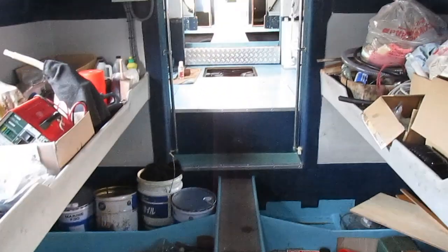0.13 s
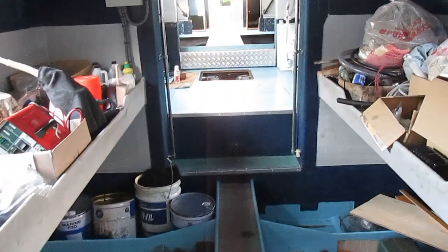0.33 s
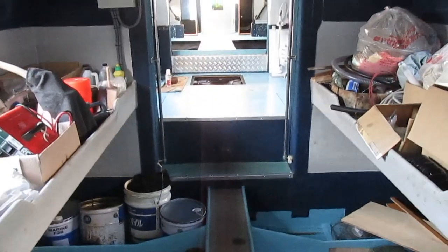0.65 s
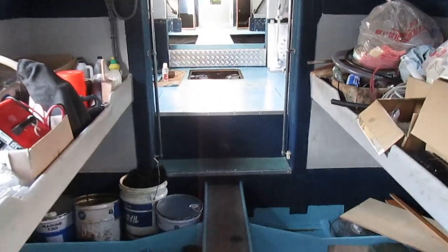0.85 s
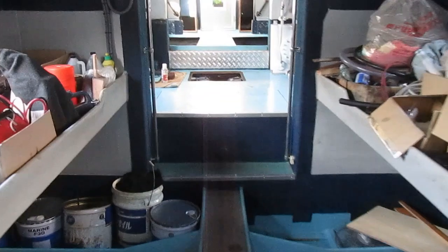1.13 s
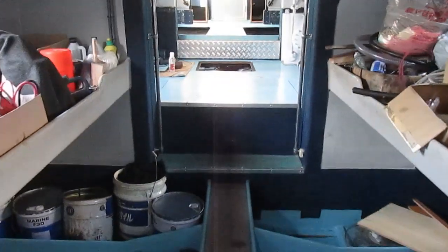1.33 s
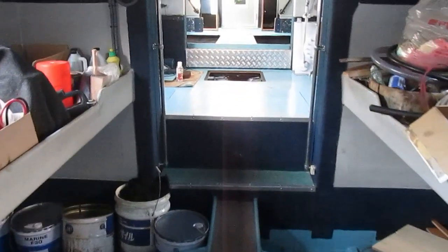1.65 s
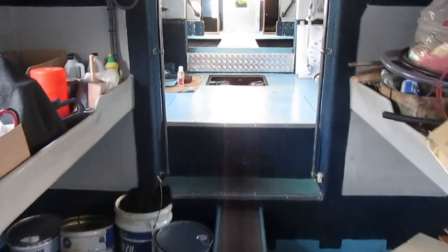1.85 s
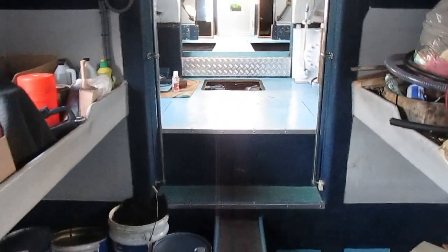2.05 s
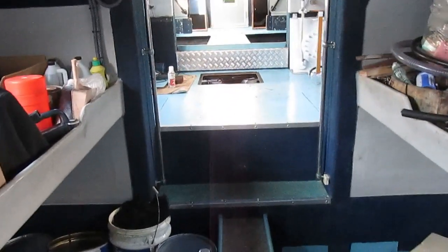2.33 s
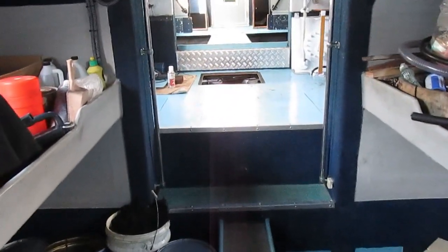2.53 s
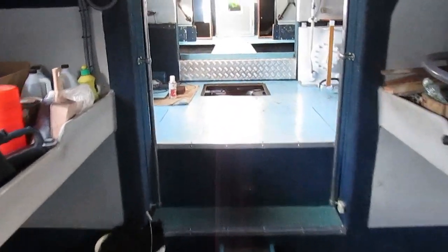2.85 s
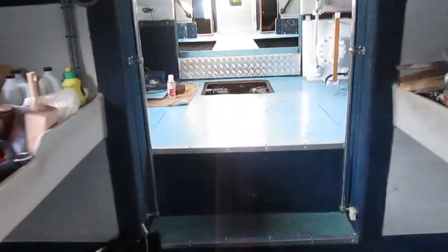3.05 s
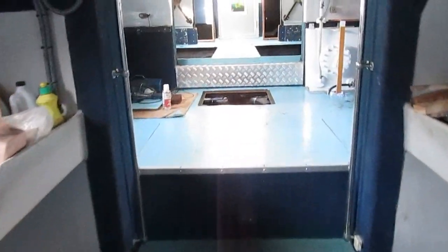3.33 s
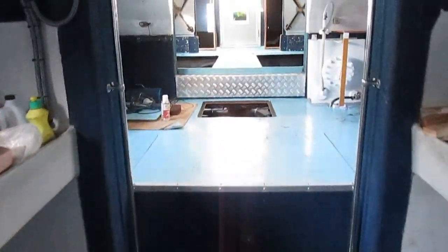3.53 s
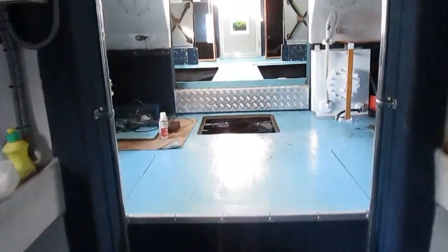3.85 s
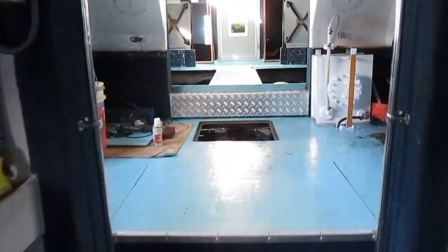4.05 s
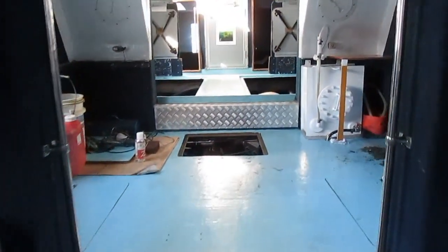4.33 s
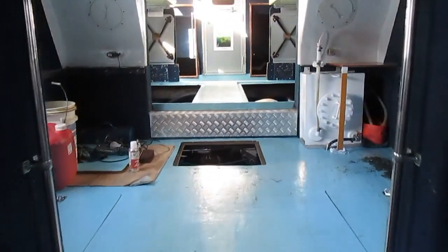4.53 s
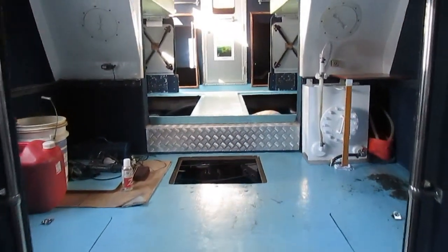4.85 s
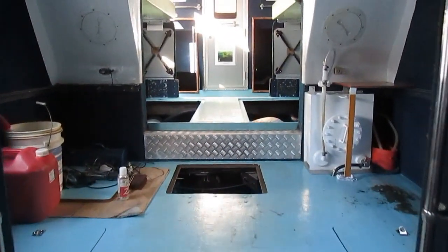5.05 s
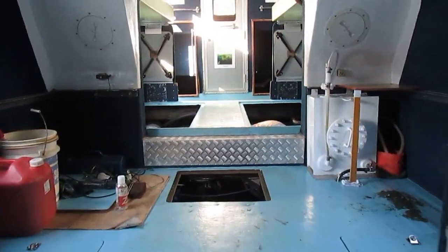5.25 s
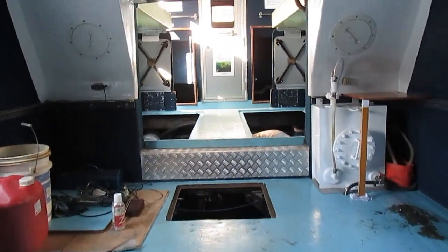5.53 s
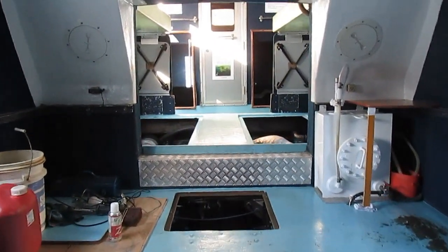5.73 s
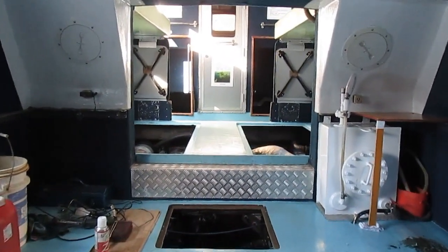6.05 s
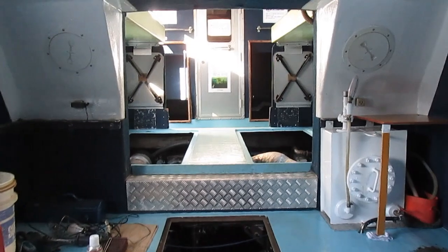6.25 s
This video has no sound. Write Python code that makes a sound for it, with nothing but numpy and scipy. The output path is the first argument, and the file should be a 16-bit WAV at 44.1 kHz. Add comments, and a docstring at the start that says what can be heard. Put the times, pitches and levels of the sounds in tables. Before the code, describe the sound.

Inside a steel boat cabin, a loud slap and heavy floor thump lead into scattered hollow knocks, jingling keys and a gritty dragging sole.

```python
"""One hears knocks on a floor, slaps, ticks, jingling keys and a dragging sole over a low hum and a hiss:
someone walks through the steel-hulled cabin of a boat, camera in hand. Feet and loose boards ring decaying
floor modes amid diffuse noise; slaps are diffuse bursts alone; the camera's shell and the keys ring modally.
The sole drags as coloured noise and squeals in narrow sliding bands; shuffling and hiss are coloured noise,
and the hull hums as a narrow band of noise."""
import sys
import numpy as np
from scipy import signal
from scipy.fft import rfft, irfft
from scipy.io import wavfile
from scipy.ndimage import uniform_filter1d

SR = 44100
rng = np.random.default_rng(int(sys.argv[2]) if len(sys.argv) > 2 else 0)


def transcribe(signal):
    """Save signal, clipped to [-1, 1], as a 16-bit WAV file at the path in sys.argv[1]."""
    frames = np.atleast_2d(signal).T
    limited = np.clip(frames, -1, 1)
    pcm = np.round(limited * 32767).astype(np.int16)
    wavfile.write(sys.argv[1], SR, pcm)


N = 282240  # samples of the whole scene
SPAN = 16384  # samples of one blow or slap


def amp(db):
    """Level law: decibels to an amplitude ratio."""
    return 10 ** (np.asarray(db) / 20)


def evened(x):
    """Power normalisation: scales to an rms of one."""
    return x / np.sqrt(np.mean(x ** 2) + 1e-20)


def read(points, hz):
    """Spectrum interpolation: reads a curve linearly over log frequency."""
    f, value = np.transpose(points)
    return np.interp(np.log(hz + 1), np.log(f + 1), value)


def curves(rows):
    """Envelope interpolation: each column of a table drawn out over the scene."""
    s, *columns = np.transpose(rows)
    t = np.arange(N) / SR
    return [np.interp(t, s, column) for column in columns]


def add(mix, s, sound):
    """Superposition: adds a sound in place from s seconds on, cut at the end of the mix."""
    part = mix[:, round(s * SR):][:, :sound.shape[1]]
    part += sound[:, :part.shape[1]]


def sides(mid, off):
    """Mid-side stereophony: left is the sum and right the difference."""
    return np.array([mid + off, mid - off])


def noise(colour, side):
    """Spectral shaping: stereo noise of a given colour, from unrelated mid and side parts."""
    hz = np.fft.rfftfreq(N, 1 / SR)
    spectrum = rfft(rng.standard_normal((2, N))) * amp(read(colour, hz))
    mid, off = irfft(spectrum * [np.ones_like(hz), amp(read(side, hz))], N)
    return sides(mid, off) / mid.std()


def resonate(x, hz, width_hz):
    """Heterodyne resonance: shifts hz down to zero, smooths twice, shifts back and evens the power."""
    turn = np.exp(2j * np.pi * np.cumsum(hz * np.ones(x.shape[-1])) / SR)
    r = np.exp(-np.pi * width_hz / SR)  # width_hz is the bandwidth of a single smoothing
    smooth = signal.lfilter([1], np.convolve([1, -r], [1, -r]), x / turn)
    return evened((turn * smooth).real)


def ring(modes, gain_db, stretch, size, detune):
    """Modal synthesis: dying sines, one for each mode, never struck at quite the same pitch."""
    hz, db, t60 = np.transpose(modes)[:, :, None]
    hz = hz * (1 + detune * rng.standard_normal(hz.shape))
    t = np.arange(size) / SR
    decay = amp(db + gain_db[:, None] - 60 * t / (t60 * stretch))
    return (decay * np.sin(2 * np.pi * hz * t)).sum(0)


def coloured(x, gain_db):
    """Minimum phase: a gain curve filters causally, so that nothing sounds ahead of the contact."""
    log_gain = np.maximum(gain_db - gain_db.max(), -90) * np.log(10) / 20
    # the Hilbert transform of the log gain, mirrored to negative frequencies, gives the phase
    mirrored = np.append(log_gain, log_gain[-2:0:-1])
    phase = -signal.hilbert(mirrored).imag[:len(log_gain)]
    return irfft(rfft(x) * np.exp(log_gain + 1j * phase))


def peaked(x):
    """Crest factor: three times the first channel's rms at its loudest moment is scaled to one."""
    power = uniform_filter1d(np.atleast_2d(x)[0] ** 2, 400)
    return x / (3 * np.abs(power).max() ** .5)


def rise_from_rest(rise):
    """Exponential build-up with a time constant of rise seconds, 0.3 ms at the least."""
    t = np.arange(SPAN) / SR
    return 1 - np.exp(-t / max(rise, .0003))


# Reverberation of the cabin. Each row: band centre in Hz, t60 in seconds before stretching.
CABIN = [(60, 1), (250, 0.69), (700, 0.25), (2000, 0.2), (6000, 0.16), (14000, 0.16)]
# Stereo width of near sounds. Each row: frequency in Hz, side against mid in dB.
SIDE_NEAR = [(60, -17.5), (110, -19.5), (200, -7), (380, -15.5), (700, -10), (1290, -7.5), (2380, -2),
             (4400, 1), (8120, 1), (15000, 1.5)]


def diffuse(rise, stretch):
    """Statistical reverberation: mid and side noise in bands, each dying at its own speed."""
    hz, t = np.fft.rfftfreq(SPAN, 1 / SR), np.arange(SPAN) / SR
    spectrum = rfft(rng.standard_normal((2, SPAN)))
    spectrum[1] *= amp(read(SIDE_NEAR, hz))
    out = np.zeros((2, SPAN))
    for k, (_, t60) in enumerate(CABIN):
        # one at this band's centre, falling to zero at its neighbours'
        share = read([(f, j == k) for j, (f, _) in enumerate(CABIN)], hz)
        out += irfft(spectrum * share) * amp(-60 * t / (t60 * max(stretch, .1)))
    return out * rise_from_rest(rise)


def aftermath(blow_db, under_db, crest_s):
    """Energy addition: a swell after each blow crests after crest_s and dies away; powers add."""
    t = np.arange(N) / SR
    coarse = t[::64]
    u = np.maximum(coarse[:, None] - np.transpose(BLOWS)[0], 0) / crest_s
    swells = amp(blow_db + under_db) * u * np.exp(1 - u)
    return np.interp(t, coarse, np.sqrt((swells ** 2).sum(axis=1)))


# Colour of the steady hiss. Each row: frequency in Hz, relative density in dB per Hz.
QUIET = [(12, -36.5), (20, 7), (65, -7.5), (117, -28), (160, 4.5), (195, -30), (237, -5), (382, -1.5),
         (1050, -8.5), (2660, -16), (5670, -24.5), (9410, -38.5), (11500, -52), (14300, -29.5),
         (16500, -43.5)]
# Stereo width of the hiss and the shuffling. Each row: frequency in Hz, side against mid in dB.
SIDE_QUIET = [(60, -3), (110, -9), (200, -6.5), (380, -4.5), (700, -7.5), (1290, -6), (2380, -1), (4400, 0),
              (8120, -1), (15000, -1.5)]
QUIET_DB = -66  # rms of the mid


def hiss():
    """Stationary noise: the steady hiss of cabin and microphone."""
    return amp(QUIET_DB) * noise(QUIET, SIDE_QUIET)


# Hum of the hull. Each row: time in seconds, level in dB before the blows' booms join in.
HUM = [(0.0, -56), (1.05, -61), (1.6, -58), (2.2, -48), (2.9, -56), (3.4, -70), (3.7, -77), (4.3, -70.5),
       (5.15, -58), (5.55, -53), (5.8, -62), (6.4, -70)]
HUM_HZ, HUM_WIDTH_HZ = 59, 14  # width of a single smoothing


def hum():
    """Narrow-band noise: a hum that wavers, and booms on after weighty blows."""
    _, db, _, _, _, _, weight_db, _ = np.transpose(BLOWS)
    boom_on = aftermath(db + weight_db, under_db=-38, crest_s=.05)
    level = np.hypot(amp(curves(HUM)[0]), boom_on)
    return level * resonate(rng.standard_normal(N), HUM_HZ, HUM_WIDTH_HZ)


# Shuffling and rustle. Each row: time in seconds, low level in dB, high level in dB,
# both before the rattle and the lumps.
STIR = [(0.0, -56, -65.5), (0.3, -57.5, -65.5), (1.0, -55, -61.5), (1.5, -58, -62.5), (2.1, -53, -62),
        (2.55, -57, -65), (3.05, -56, -62.5), (3.6, -58, -65), (4.05, -55, -64), (4.7, -58.5, -66.5),
        (5.2, -58, -70), (5.85, -55, -62), (6.4, -61, -65)]
# Colours of the two layers. Each row: frequency in Hz, relative density in dB per Hz.
STIR_LOW = [(60, -3), (110, -0.5), (300, -2.5), (800, -4.5), (1450, -9), (1900, -17), (2800, -39)]
STIR_HIGH = [(1500, 0), (3000, -1.5), (5300, -4.5), (5780, 1.5), (6300, -1), (9000, -6.5), (15000, -15)]
RATTLE_SHARE = .6  # the rattle grows more slowly than the blow, dB per dB
LUMPS_DB = 2.0  # rms of the level's wandering


def stir():
    """Modulated noise: feet and clothes shift in uneven lumps, and loose things rattle on after blows."""
    low_db, high_db = curves(STIR)
    blow_db = RATTLE_SHARE * np.transpose(BLOWS)[1]
    low = np.hypot(amp(low_db), aftermath(blow_db, under_db=-40, crest_s=.05))
    high = np.hypot(amp(high_db), aftermath(blow_db, under_db=-59, crest_s=.06))
    wander = uniform_filter1d(uniform_filter1d(rng.standard_normal(N), 2000), 2000)
    lumps_db = LUMPS_DB * evened(wander)
    layers = low * noise(STIR_LOW, SIDE_QUIET) + high * noise(STIR_HIGH, SIDE_QUIET)
    return amp(lumps_db) * layers


# A sole drags. Each row: time in seconds, hiss level in dB, fine fizz level in dB, rumble level in dB.
DRAG = [(5.03, -64, -87, -84), (5.1, -55, -62, -53), (5.14, -46.5, -50.5, -49), (5.2, -43.5, -49.5, -44),
        (5.28, -44.5, -52.5, -41), (5.4, -47, -61, -39), (5.52, -52.5, -66, -45), (5.6, -55, -68, -54),
        (5.72, -57, -74, -57), (5.85, -72, -86, -64)]
# Colours of the three layers. Each row: frequency in Hz, relative density in dB per Hz.
DRAG_HISS = [(530, -29), (900, -1), (1550, -4), (1690, -1.5), (3300, -3.5), (3620, -4.5), (4420, -10),
             (4960, -6), (11000, -28), (14300, -58), (22000, -120)]
DRAG_FIZZ = [(3530, -15), (6000, -1), (7460, -4), (8100, -6), (8860, -7.5), (15100, -20), (16000, -20)]
DRAG_RUMBLE = [(29, -37), (50, -6), (119, -4), (161, 0), (284, -12), (509, -10), (747, -12.5), (813, -14),
               (1500, -46), (1950, -57), (3300, -120)]


def drag():
    """Friction noise: grit hisses and fizzes under the sole and the deck rumbles."""
    t = np.arange(N) / SR
    moving = (t > DRAG[0][0]) & (t < DRAG[-1][0])
    layers = zip(curves(DRAG), (DRAG_HISS, DRAG_FIZZ, DRAG_RUMBLE))
    return moving * sum(amp(db) * noise(colour, SIDE_NEAR) for db, colour in layers)


# The sole half squeals. Each row: start in seconds, length in seconds, level in dB before the fades,
# first pitch in Hz, last pitch in Hz, width of a single smoothing in Hz.
SQUEALS = [(5.11, .12, -42, 3250, 3300, 700.), (5.19, 0.12, -46, 3550, 4020, 600.),
           (5.15, 0.085, -47.5, 1610, 1700, 250.), (5.39, 0.14, -44.5, 3650, 3600, 500.),
           (5.47, 0.084, -55, 4660, 4620, 320.), (5.585, 0.11, -53, 2880, 2880, 480.)]


def squeal(length, db, from_hz, to_hz, width_hz):
    """Frictional squeal: noise in a narrow, sliding band."""
    size = round(length * SR)
    pitch_hz = np.linspace(from_hz, to_hz, size)
    band = resonate(rng.standard_normal((2, SPAN))[:, :size], pitch_hz, width_hz)
    return amp(db) * band * signal.windows.tukey(size, .4)


# Keys touching. Each row: start in seconds, crest level in dB, gain of the modes under 9 kHz in dB.
JINGLES = [(0.082, -47.5, 0), (0.695, -44, -3), (0.82, -44.5, 1), (0.95, -43, 2), (1.371, -34.5, -7),
           (1.403, -45, -6), (1.532, -47.5, 9), (1.62, -51, -1.5), (2.1794, -43.5, 5), (2.454, -48.5, -7),
           (2.88, -47, 3), (3.009, -48, 8), (3.096, -41, 5), (3.133, -39, -5), (3.165, -48, -4),
           (3.4464, -50, -1.5), (3.4794, -53, -1.5), (3.5394, -51.5, 9), (3.709, -52, -5), (4.4897, -51, 4),
           (4.835, -42.5, -1), (5.0544, -46, 3), (5.714, -50, -4), (5.739, -42, -1.5), (5.978, -50, -1.5),
           (6.154, -44, 3), (6.307, -47, 0)]
# Modes of the keys. Each row: frequency in Hz, level in dB before the jingle's gains, t60 in seconds.
KEYS = [(5790, -2, .035), (8440, -9, .022), (10300, -12, .015), (11300, 0, .04), (11900, -9, .015),
        (14050, -3, .035)]
CHATTER_S, CHATTER_DECAY_S = .043, .035  # span of the touches; time constant of their fading
KEY_TOP_DB = -5  # gain of the top mode


def jingle(db, low_db):
    """Repeated impact: keys chatter for a moment, each touch ringing the same few modes."""
    hz = np.transpose(KEYS)[0]
    gain_db = low_db * (hz < 9000) + KEY_TOP_DB * (hz > 13000)
    out = np.zeros((2, 8000))
    for s in np.append(0, CHATTER_S * rng.random(8)):
        uneven_db = 4 * rng.standard_normal((2, len(KEYS)))  # left and right
        touch = [ring(KEYS, gain_db + side_db, 1, size=2000, detune=.007) for side_db in uneven_db]
        add(out, s, np.array(touch) * np.exp(-s / CHATTER_DECAY_S))
    return amp(db) * peaked(out)


# Dry ticks. Each row: start in seconds, peak in dB before panning, knock of the lowest mode in dB,
# tilt of the other modes in dB per octave.
TICKS = [(0.0539, -27.5, -9, 4), (0.1485, -35, 4, 0.1), (0.816, -28, -1, 3), (1.3181, -14.5, -20, -0.5),
         (1.6032, -27, 6.5, 1.1), (1.7684, -34.5, 5, -7), (1.819, -30, -8, 0.1), (2.8071, -27.5, 6, 2.1),
         (2.9354, -27, 0.1, 0.1), (3.9663, -35.5, -4, -5), (6.137, -29, 9, -13)]
# Modes of the camera's shell. Each row: frequency in Hz, level in dB before knock and tilt, t60 in seconds.
SHELL = [(1250, 0, .009), (2400, -8, .004), (3500, -6, .003), (5200, -5, .002), (7000, -1, .0026),
         (9000, -5, .002), (12000, -5, .002), (14500, -6, .002)]
TICK_PAN_DB = -8  # left against right: the hand grips on the right
CRACKLE_S = .00096  # time constant


def tick(db, knock_db, tilt):
    """Source-filter convolution: a short crackle excites the shell, straight to the microphones."""
    hz = np.transpose(SHELL)[0]
    gain_db = np.where(hz == hz.min(), knock_db, tilt * np.log2(hz / 6000))
    shell = ring(SHELL, gain_db, 1, size=800, detune=.03)
    crackle = rng.standard_normal((2, 400)) * np.exp(-np.arange(400) / (CRACKLE_S * SR))
    both = signal.oaconvolve(crackle, shell[None])
    pan = amp([[TICK_PAN_DB / 2], [-TICK_PAN_DB / 2]])
    return amp(db) * both / np.abs(both).max(1, keepdims=True) * pan


# Flat slaps and brushes of cloth. Each row: start in seconds, crest level in dB,
# treble tilt in dB per octave well above 1 kHz.
SLAPS = [(0.4389, -26.5, 5.6), (0.4894, -36.5, 11), (0.7058, -46, 12), (1.0241, -8.5, 5.33),
         (1.1004, -27.5, 9), (1.2351, -39, 10), (1.491, -43, 11.5), (2.1794, -53, 15), (3.2594, -37.5, 0.1),
         (3.8926, -31, 0.8), (4.5501, -33.5, -4.1), (4.9337, -46.5, 1.1), (5.0574, -42, 1.1)]
# Colour of a slap before its tilt. Each row: frequency in Hz, relative density in dB per Hz.
SLAP = [(88, -42.5), (150, -6.5), (226, -32.5), (361, 6), (475, 0), (905, 5.5), (1120, -0.5), (1940, -8),
        (6770, -9.5), (14500, -29.5), (16000, -30.5)]
SLAP_RISE_S, SOFT_RISE_S_PER_DB = .0009, .00006  # time constant; fainter contacts are softer
SLAP_RING = .92  # factor on the cabin's t60


def slap(db, tilt):
    """Broadband impact: a flat contact makes wide noise, at once diffuse."""
    hz = np.fft.rfftfreq(SPAN, 1 / SR)
    colour_db = read(SLAP, hz) + tilt * np.log2(1 + hz / 1000)
    burst = diffuse(SLAP_RISE_S - SOFT_RISE_S_PER_DB * db, SLAP_RING)
    mid, off = peaked(coloured(burst, colour_db))
    return amp(db) * sides(mid, off)


# Blows on the floor. Each row: start in seconds, crest level of the modes in dB before damping,
# strongest frequency in Hz, fall below it in dB per octave, fall above it in dB per octave,
# boom of the boards in dB, weight (deep bass) in dB, ring as a factor on t60.
BLOWS = [(0.619, -39, 366, 7.9, 2.7, -18, 9.5, 2.7), (0.7, -38.5, 704, 14, 24, -27, -18, .89),
         (0.945, -36, 790, 17, 20, -33, -18, 1), (1.151, -3.5, 486, 12, 11, -24, 1.5, 1.23),
         (1.158, -7, 450, 3.9, 19, -21, 5, .62), (1.197, -20.5, 404, 4.3, 18, -16, -17, .84),
         (1.248, -12, 476, 21, 10.1, -6, -21, 1.2), (1.36, -33.5, 457, 2.3, 6.4, -13, -1, 1.1),
         (1.427, -26.5, 586, 15, 6, 16, 20, .87), (1.54, -31.5, 510, 3.4, 3.7, -17.5, -13, 1.3),
         (1.701, -17.5, 443, 21, 22.3, 0, -44, 1.27), (1.855, -12.5, 390, 3.2, 12.7, -23, 11.5, 1.05),
         (1.891, -22, 380, 7.7, 8.8, -20.5, 7, 1.5), (2.04, -34, 410, 3.4, 5.1, 11, 5, 2.4),
         (2.117, -20.5, 700, 3.8, 15.3, 1, 4, .92), (2.169, -30, 680, 5.4, 24, 0, 3, .58),
         (2.237, -23, 318, 2.5, 18, 7, 4, .69), (2.318, -26.5, 314, 2.3, 14, 3.5, -19, .69),
         (2.393, -34.5, 513, 7, 5.4, -19, -21, .81), (2.488, -22.5, 544, 2.3, 24, 8, 11, .72),
         (2.663, -36, 340, 7, 11, -8, 13.5, 1.1), (2.768, -34.5, 360, 2.3, 9.8, -6, 11, 1.3),
         (2.864, -14.5, 623, 10, 8, -17, -48, 1.29), (2.991, -22.5, 496, 2.3, 11.7, -9, 9, 1.1),
         (3.109, -35, 780, 3, 13, -21, -12, 1.13), (3.24, -42, 511, 4.7, 2.7, -20, -20, .61),
         (3.887, -22, 446, 14.6, 5.2, -27, -48, 1.8), (3.934, -19, 720, 5, 4.1, -28, -41, 1.05),
         (4.556, -27, 340, 20.4, 8.2, -30, -45, 1.28), (4.568, -15.5, 950, 5, 20, -36, -46, 1.05),
         (4.839, -39, 635, 10, 8.4, -25, -35, 2.6), (5.384, -29, 487, 4.1, 11, -34, -13, 2.3),
         (5.442, -15.5, 560, 7, 4.2, -31, -36, 1.13), (5.744, -44, 775, 8.3, 9.6, -22, -18, .81),
         (5.831, -41, 773, 6, 11, -31, -27, .82), (6.112, -23, 370, 14, 8.8, -29, -40, 2.2),
         (6.135, -19.5, 1060, 5.5, 13.7, -31, -42, 1.05), (6.232, -14.5, 426, 21, 8, -26, -35, 1.24),
         (6.289, -27.5, 571, 16, 13.4, -2.5, -35, 1.5)]
# Modes of the floor. Each row: frequency in Hz, level in dB before the blow's colour,
# t60 in seconds before the ring factor.
FLOOR_MODES = [(67, -19, 0.75), (91.9, -4, 0.29), (192, 1, 0.23), (277.2, 2, 0.12), (379.8, -6, 0.28),
               (404, -0.5, 0.089), (444.3, -2.5, 0.2), (584, -4, 0.13), (641.8, 0, 0.13), (804.6, -3, 0.11),
               (872, -9.5, 0.24), (983, 5, 0.041), (1171, 4.5, 0.064), (1347, -1, 0.14), (1728, 10, 0.04)]
CABIN_DB = -4  # diffuse sound against the modes
BOOM_HZ, BASS_HZ, SOLE_HZ = 185, 85, 1710  # boards; weight; a sole's dull top
RISE_S, RISE_S_PER_DB = .003, .00004  # the more weight behind a blow, the slower it rises
SETTLE_S, SETTLE_S_PER_DB = .029, -.00045  # the foot settles, sooner with weight,
DAMPING_DB, DAMPING_PER_DB = 5, .075  # and stills the floor, more so with weight
STILLING_S = .0087  # length of the stilling


def blow(db, top_hz, below, above, boom_db, weight_db, stretch):
    """Modal excitation: a foot or a board rings the floor's modes and fills the cabin."""
    hz, t = np.fft.rfftfreq(SPAN, 1 / SR) + 1, np.arange(SPAN) / SR
    rise = RISE_S + RISE_S_PER_DB * weight_db

    octaves = np.log2(hz / top_hz)
    fall_below_db = abs(below) * np.minimum(octaves, 0)
    fall_above_db = abs(above) * np.maximum(octaves - .4, 0)  # a broad top
    body = amp(fall_below_db - fall_above_db) / (1 + (hz / SOLE_HZ) ** 2)
    boom = amp(boom_db - 18 * np.log2(hz / BOOM_HZ) ** 2)
    weight = amp(weight_db - 5.4 * np.log2(hz / BASS_HZ) ** 2)
    colour_db = 10 * np.log10(body ** 2 + boom ** 2 + weight ** 2)

    spot_db = 1.04 * rng.standard_normal(len(FLOOR_MODES))  # every spot stirs the modes differently
    modes = ring(FLOOR_MODES, spot_db, max(stretch, .1), SPAN, .012) * rise_from_rest(rise)
    floor = peaked(coloured(modes, colour_db))
    thin_db = -9 * np.log2(1 + 200 / hz)  # the small cabin scatters little bass
    mid, off = amp(CABIN_DB) * peaked(coloured(diffuse(rise, stretch), colour_db + thin_db))

    settled_s = SETTLE_S + SETTLE_S_PER_DB * weight_db
    damping_db = DAMPING_DB + DAMPING_PER_DB * weight_db
    damped = amp(-damping_db * np.clip((t - settled_s) / STILLING_S, 0, 1))
    return amp(db) * damped * sides(mid + floor, 1.1 * off)


def scene():
    """Superposition: the continuous layers, then every single event at its time."""
    mix = hiss() + hum() + stir() + drag()
    events = ((SQUEALS, squeal), (JINGLES, jingle), (TICKS, tick), (SLAPS, slap), (BLOWS, blow))
    for table, source in events:
        for s, *row in table:
            add(mix, s, source(*row))
    return mix


EDGE_HZ = 15900


def record(dry):
    """Band limitation: a linear-phase low-pass filter removes the highest treble."""
    low_pass = signal.firwin(511, EDGE_HZ, window=("kaiser", 9), fs=SR)
    return signal.oaconvolve(dry, low_pass[None], "same")


dry = scene()
out = record(dry)
transcribe(out)
```